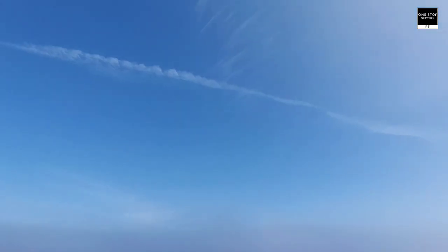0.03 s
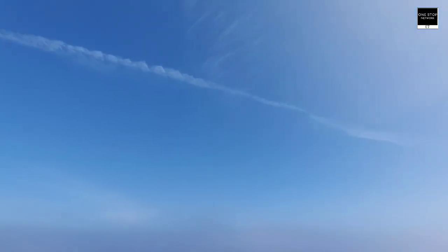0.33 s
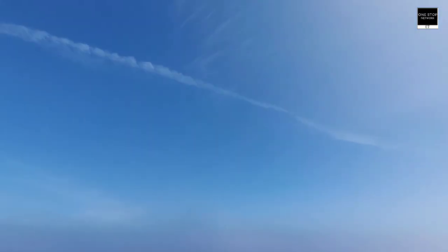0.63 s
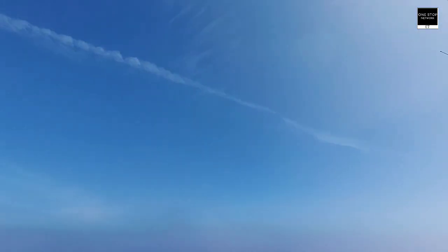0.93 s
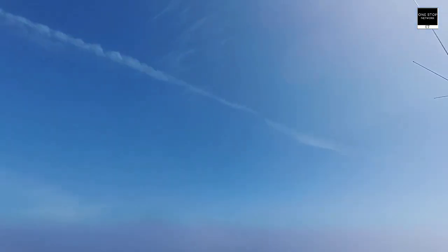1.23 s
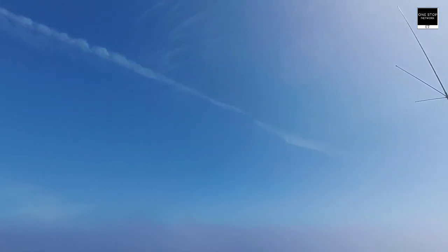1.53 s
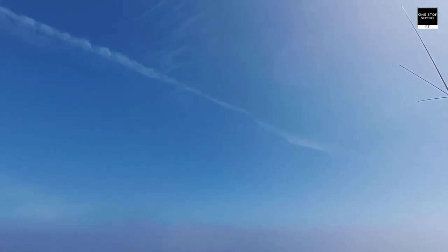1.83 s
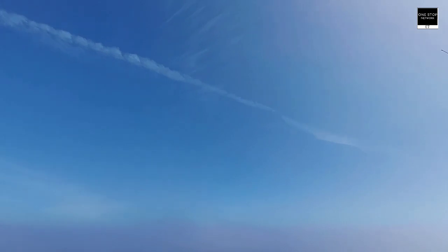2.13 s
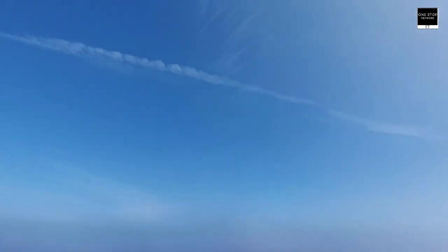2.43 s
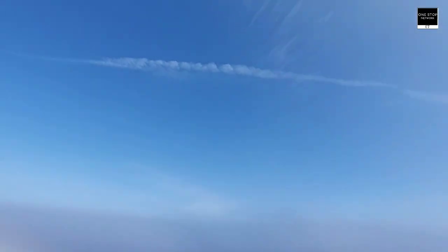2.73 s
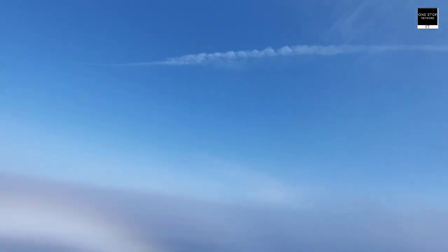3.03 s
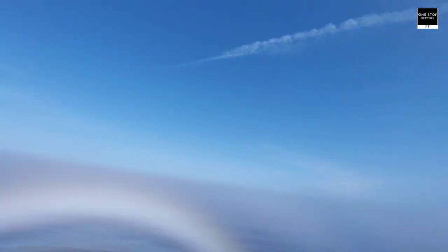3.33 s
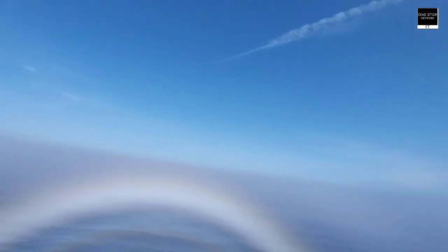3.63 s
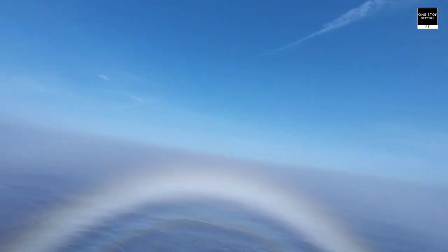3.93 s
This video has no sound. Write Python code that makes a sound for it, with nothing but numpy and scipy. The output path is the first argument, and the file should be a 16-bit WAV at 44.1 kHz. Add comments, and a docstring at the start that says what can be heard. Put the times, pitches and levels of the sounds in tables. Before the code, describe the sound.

A loud, low ship's horn sounds, then fades over the sea amid gusting wind.

```python
"""A ship's foghorn holds one low note, heard from the open deck, sags as its air is cut and echoes away.
Compressed air beats its diaphragm, the flare gives a stack of partials, and the waves scatter them back.
Gusts buffet the two ports of a slowly turning microphone, hardest in the last seconds.
Underneath, the sea washes along the hull."""
import sys
import numpy as np
from scipy import signal
from scipy.fft import rfft, irfft, next_fast_len
from scipy.io import wavfile
from scipy.ndimage import uniform_filter1d, minimum_filter1d, map_coordinates

SR = 44100
rng = np.random.default_rng(int(sys.argv[2]) if len(sys.argv) > 2 else 0)


def log_audio(samples):
    """Write samples as a 16-bit WAV file to the path given in sys.argv[1]."""
    # one column per channel
    frames = np.atleast_2d(samples).T
    # limit to full scale, then quantise
    limited = np.clip(frames, -1, 1)
    pcm = np.round(limited * 32767).astype(np.int16)
    wavfile.write(sys.argv[1], SR, pcm)


N = 176400
PREROLL = SR  # the horn is already sounding a second before we listen

# how much sooner the left port hears the horn (time [s], lead [ms])
LEFT_LEAD = [(0.1, 0.27), (1.4, 0.2)]


def horn():
    """The diaphragm beats, the flare gives partials; returns the sound on deck and that sent out to sea."""
    # the note, sagging as the air is cut (time [s], pitch [Hz], drive [dB])
    blast = [(0, 132.4, -3.5), (.9, 132.2, -3), (1.522, 132.1, -2.5), (1.56, 127.6, -1.5),
             (1.595, 120.6, -15.5), (1.66, 123.3, -24)]
    # low partials, from the fundamental up (level [dB])
    low_partials = [-12.5, 0, -12, -25.5, -14, -22, -21.5, -25.5, -28.5, -26, -22, -22, -29.5, -27, -29,
                    -28.5, -33, -37, -44]
    # brassy high partials (frequency [Hz], level [dB])
    brass = [(2600, -54), (3000, -53.5), (3500, -51.5), (5200, -74)]
    # five bands of the horn as the microphone turns (time [s], level [dB])
    bass = [(1, -1), (1.5, -9)]
    low_mid = [(.55, 1), (.95, -14.5), (1.5, -6.5)]
    mid = [(.35, -1), (.53, -4.5), (.75, 0.5), (1.4, 2.5)]
    high_mid = [(.55, -3.5), (.9, 3.5), (1.2, 8.5), (1.5, 2)]
    treble = [(0, -2.5), (.6, 11), (1.1, -2.5), (1.5, -6)]
    jitter, rasp_s = .0004, .000021  # scatter in the diaphragm's pitch and in the timing of its beats
    echo_shift, echo_smear = 1.015, .012  # the ship's motion lifts the echo's pitch, the waves scatter it
    t = np.arange(-PREROLL, N) / SR
    t = t[t < blast[-1][0]]
    size = len(t)
    pitch = curve(blast, t) * (1 + jitter * wobble(65, size))
    phase = 2 * np.pi * (np.cumsum(pitch) / SR + pitch * rasp_s * wobble(170, size))
    drive = amp(curve(blast, t, axis=2) - 12)
    lead_s = curve(LEFT_LEAD, t) / 1000
    bands = [(bass, (1, 3)), (low_mid, (6, 7)), (mid, (4, 9, 10, 11, 12)),
             (high_mid, (13, 14, 15)), (treble, (17, 18, 19, 20))]
    turning_db = {k: curve(level, t) for level, partials in bands for k in partials}
    ports, outward = np.zeros((2, PREROLL + N)), np.zeros(PREROLL + N)
    for k in range(1, 41):
        hz = k * blast[1][1]
        partial_db = low_partials[k - 1] if k <= len(low_partials) else along(brass, hz)
        gain = np.sqrt(2) * drive * amp(partial_db)
        start_phase = rng.normal(0, 1.076)
        flutter_db = -0.27 + 2.67 * hz / 1000  # high partials flutter most in the wind
        shared_flutter = wobble(6.39, size)
        for port, side in enumerate((1, -1)):
            flutter = .5 * (shared_flutter + wobble(15, size))
            sway = amp(turning_db.get(k, 0) + flutter_db * flutter)
            ports[port, :size] += gain * sway * np.sin(k * phase + start_phase + side * np.pi * hz * lead_s)
        scattered_hz = k * pitch * (echo_shift + echo_smear * wobble(22, size))
        outward[:size] += gain * np.sin(2 * np.pi * np.cumsum(scattered_hz) / SR)
    return ports[:, PREROLL:], outward


def echo(outward):
    """The note comes back scattered from distant waves, fading in and out."""
    # ring of the echo (frequency [Hz], time to fall 60 dB [s])
    decay = [(130, 3.35), (1700, 2.17), (4000, 4)]
    # spectrum of the echo (frequency [Hz], level [dB])
    colour = [(130, -8.5), (270, -17), (500, -11.5), (1300, -11.5), (3500, -6.5)]
    # the echo comes forward as the horn stops (time [s], level [dB])
    level = [(1.45, -9), (1.7, 0)]
    hz, t, spectra = signal.stft(rng.standard_normal((2, 2 * SR)), SR, nperseg=256)
    spectra *= amp(-60 * t / along(decay, hz)[:, None])
    tail = signal.istft(spectra, SR, nperseg=256)[1]
    tail = filtered(tail / np.linalg.norm(tail[0]), lambda f: amp(along(colour, f)))
    returned = signal.fftconvolve(outward[None], tail, axes=1)[:, PREROLL:PREROLL + N]
    waver_db = 2.5 * wobble(16)
    return returned * amp(curve(level, np.arange(N) / SR) + waver_db)


def air(t):
    """Compressed air hisses through the horn and puffs out as the valve shuts."""
    # spectrum of the escaping air (frequency [Hz], level [dB])
    colour = [(100, -29.5), (500, 13.5), (2200, -10.5), (2900, -18), (3600, -3.5), (8000, -51)]
    # its swell at the valve's closing (time [s], level [dB])
    level = [(1.5, -47), (1.55, -36), (1.635, -39), (1.69, -47), (1.85, -58)]
    flow = amp(curve(level, t)) * (t < level[-1][0])
    return flow * noise(colour, alike=0.21, lead_ms=LEFT_LEAD[-1][1])


def wind(t):
    """Gusts on the microphone's ports: rumble, buffeting and a crackle that grows faster than both."""
    # strength of the gusts (time [s], level [dB])
    gusts = [(.05, -20), (.3, -38.5), (1.13, -43.5), (1.25, -28), (1.45, -37), (1.62, -32), (1.75, -47),
             (2.21, -49), (2.33, -38), (2.51, -45.5), (2.73, -25), (3.2, -25), (4, -34.5)]
    # single puffs and brief drops (time [s], level against the wind [dB])
    puffs = [(.054, 9), (.452, 15.5), (.59, 15.5), (1.243, 10.5), (2.002, 9.5), (2.585, 9.5), (2.69, 8.5),
             (2.755, 3), (2.804, 5.5), (2.875, 5), (2.92, 3), (2.963, 6.5), (3.012, 6), (3.055, 10.5),
             (3.078, 9.5), (3.103, 5), (3.2, 5.5), (3.222, 7.5), (3.271, 8), (3.425, 3.5), (3.627, 9),
             (3.706, 8), (3.763, 5), (3.958, 8)]
    lulls = [(2.617, -3.5), (2.785, -4), (3.034, -9), (3.35, -7)]
    # big eddies that thump in the rumble (time [s], rise [dB])
    swells = [(2.74, 6), (2.845, 4), (2.96, 4), (3.25, 7), (3.34, 12), (3.6, 7.5), (3.703, 4.5)]
    # spectra of the three layers (frequency [Hz], level [dB])
    rumble_colour = [(12, -26.5), (25, -18), (55, -0.5), (125, -0.5), (200, -15), (1000, -88.5)]
    buffet_colour = [(50, -17.5), (130, -0.5), (270, 1.5), (500, -1.5), (680, -8.5), (1500, -38),
                     (8000, -101)]
    crackle_colour = [(200, -29), (800, 4), (2200, -14.5), (2900, -23.5), (4200, -29), (9000, -51),
                      (15000, -65.5)]
    strong_db = -22.5  # a strong gust
    rumble_growth, crackle_growth = 0.65, 1.32  # dB per dB of wind
    wind_db = curve(gusts, t)
    puff_db = bumps(puffs + lulls, t, width_s=0.011)
    gust_db = wind_db + puff_db
    swell_db = bumps(swells, t, width_s=0.026)
    rumble_db = -23.5 + rumble_growth * (wind_db - strong_db) + .5 * puff_db + swell_db
    crackle_db = -33.5 + crackle_growth * (gust_db - 0.13 * puff_db - strong_db)
    swirl = eddies(rate=70, depth_db=2.9)
    rumble = amp(rumble_db) * eddies(rate=35, depth_db=3.0) * noise(rumble_colour, alike=0.35)
    buffet = amp(gust_db + 1.5) * swirl * noise(buffet_colour, alike=0.13)
    crackle = amp(crackle_db) * swirl * eddies(rate=220, depth_db=4.5) * noise(crackle_colour)
    return rumble + buffet + crackle


def eddies(rate, depth_db):
    """Fast swings of pressure, different at each port."""
    return unit(amp(depth_db * np.array([wobble(rate), wobble(rate)])))


def slaps(t):
    """An eddy bursts as one push of pressure between two suctions, a little apart at the two ports."""
    # bursts right on the microphone (time [s], peak [dB])
    bursts = [(.051, -5), (2.963, -7), (3.27, -12)]
    half_push_s = .001
    pressure = np.zeros((2, N))
    for time, peak_db in bursts:
        offset = (t - time) / half_push_s + rng.normal(0, 0.31, (2, 1))
        pressure += amp(peak_db) * (1 - offset ** 2) * np.exp(-.5 * offset ** 2)
    return pressure


def sea(t):
    """Water washes along the hull below the deck, with a fine high hiss."""
    # spectra of the wash and the hiss (frequency [Hz], level [dB])
    wash_colour = [(25, -11), (110, 4), (400, -5), (1200, -17), (1700, -15.5), (2300, -16.5), (2900, -24.5),
                   (6000, -29), (10000, -46)]
    hiss_colour = [(1000, -19), (5500, -1.5), (8500, -2), (10500, 1), (15000, -3.5)]
    # the steady wash (time [s], level [dB])
    wash_level = [(2.6, -43.5), (3.4, -43.5)]
    # the hiss at each port (time [s], left [dB], right [dB])
    hiss_level = [(0, -63, -75), (1.7, -65, -76), (2.4, -61, -75), (3.8, -59.5, -67)]
    wash = amp(curve(wash_level, t) + 1.2 * wobble(21)) * noise(wash_colour, alike=0.14, lead_ms=0.23)
    hiss_db = np.array([curve(hiss_level, t), curve(hiss_level, t, axis=2)])
    hiss = amp(hiss_db + .5 * wobble(15)) * noise(hiss_colour)
    return wash + hiss


def amp(db):
    """Decibels to gain."""
    return 10 ** (np.asarray(db) / 20)


def unit(x):
    """Scale to rms 1."""
    return x / np.sqrt(np.mean(x ** 2) + 1e-20)


def along(points, hz):
    """Read (frequency [Hz], value) points on a log frequency axis."""
    frequencies, values = np.transpose(points)
    return np.interp(np.log(hz + 1), np.log(frequencies + 1), values)


def curve(rows, t, axis=1):
    """One column of a time table at the times t."""
    rows = np.array(rows)
    return np.interp(t, rows[:, 0], rows[:, axis])


def bumps(rows, t, width_s):
    """Bell-shaped rises or dips in dB."""
    return sum(db * np.exp(-.5 * ((t - time) / width_s) ** 2) for time, db in rows)


def wobble(rate, size=N):
    """A smooth random curve, rate knots a second."""
    coarse = np.arange(0, size + 32, 32)
    knots = rng.standard_normal(4096)
    return np.interp(np.arange(size), coarse, map_coordinates(knots, [coarse * rate / SR], mode="wrap"))


def filtered(x, response):
    """Multiply the spectrum of x by a function of frequency."""
    size = x.shape[-1]
    padded = next_fast_len(size + SR // 4)
    return irfft(rfft(x, padded) * response(np.fft.rfftfreq(padded, 1 / SR)), padded)[..., :size]


def noise(colour, alike=0, lead_ms=0):
    """Coloured stereo noise of rms 1; its shared part reaches the left port lead_ms sooner."""
    left, right, shared = rng.standard_normal((3, N))
    sides = np.array([[1], [-1]])
    shared = filtered(shared, lambda hz: np.exp(1j * np.pi * hz * lead_ms / 1000 * sides))
    white = np.sqrt(1 - alike) * np.array([left, right]) + np.sqrt(alike) * shared
    return unit(filtered(white, lambda hz: amp(along(colour, hz))))


def scene():
    """Horn, echo, wind and sea at the microphone on deck."""
    t = np.arange(N) / SR
    direct, outward = horn()
    return direct + echo(outward) + air(t) + wind(t) + slaps(t) + sea(t)


def record(dry):
    """The recorder's limiter ducks everything under the hardest puffs; the top treble is cut off."""
    ceiling_db, hold_s, top_hz = -3, 0.034, 15750
    hold = int(hold_s * SR)
    needed = np.minimum(1, amp(ceiling_db) / (np.abs(dry).max(axis=0) + 1e-9))
    gain = uniform_filter1d(minimum_filter1d(needed, hold), hold)
    return filtered(dry * gain, lambda hz: hz < top_hz)


dry = scene()
out = record(dry)
log_audio(out)
```